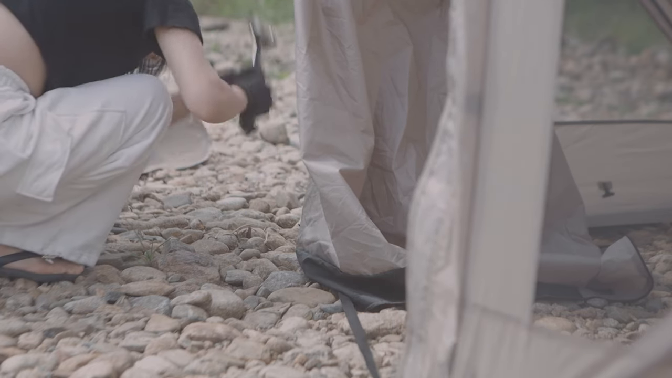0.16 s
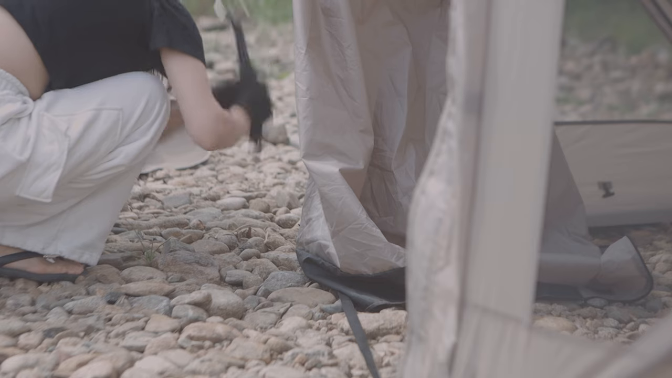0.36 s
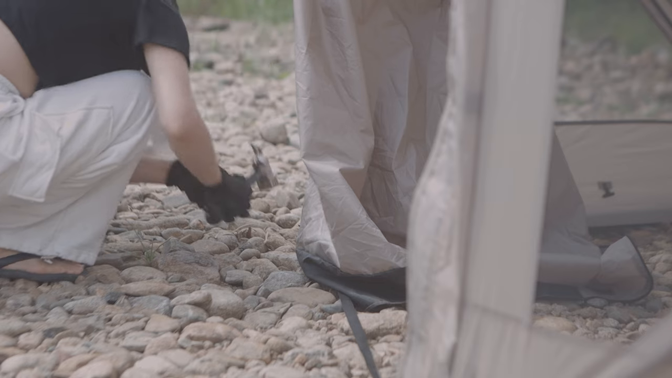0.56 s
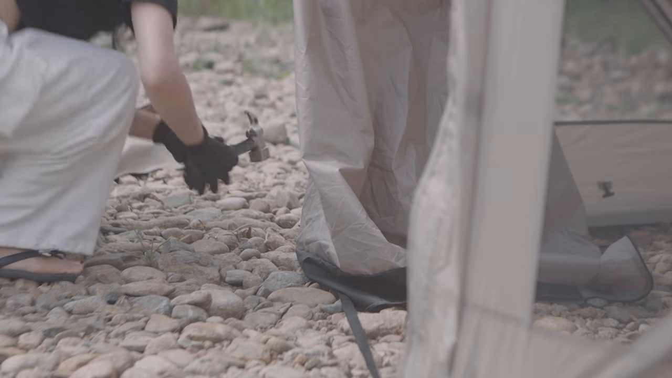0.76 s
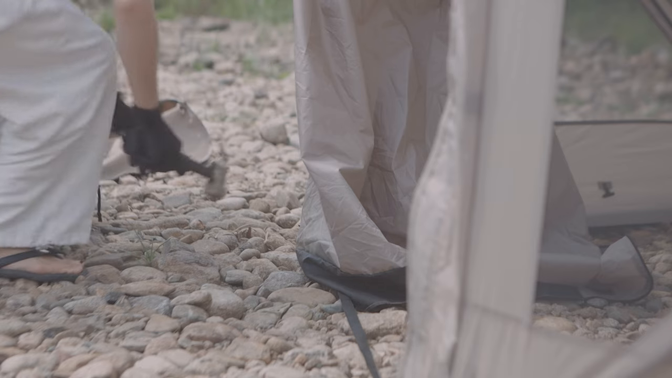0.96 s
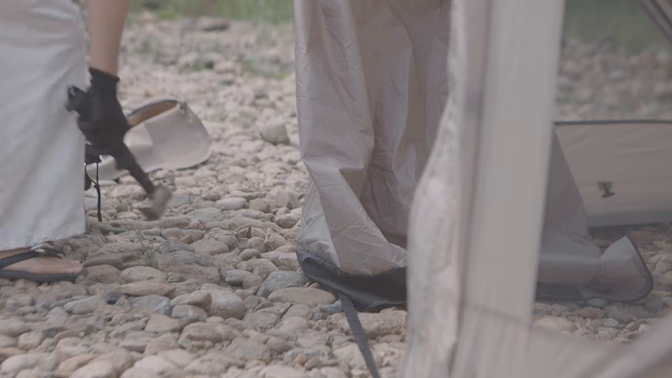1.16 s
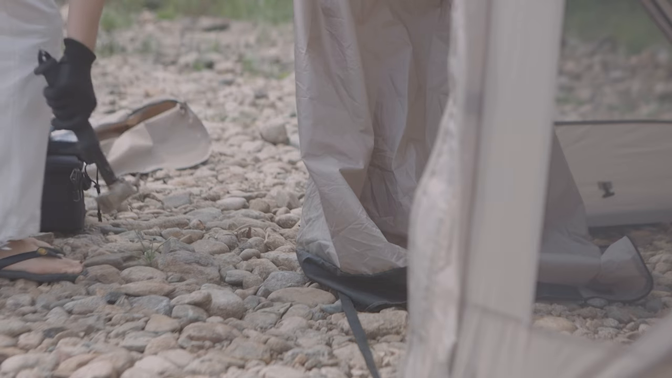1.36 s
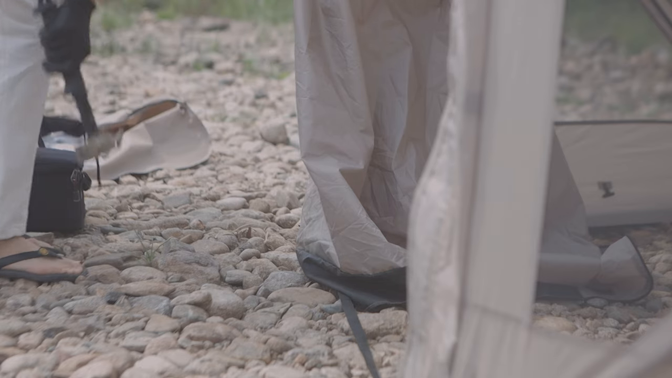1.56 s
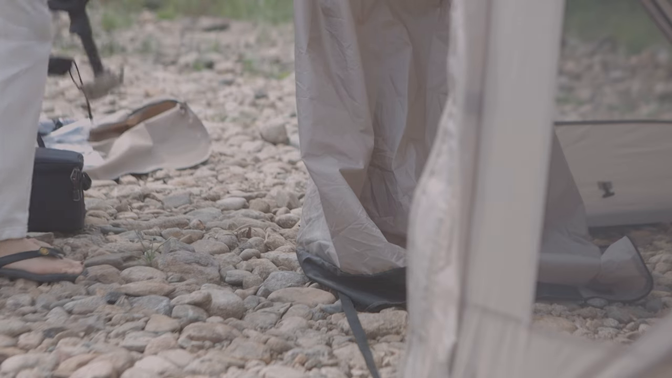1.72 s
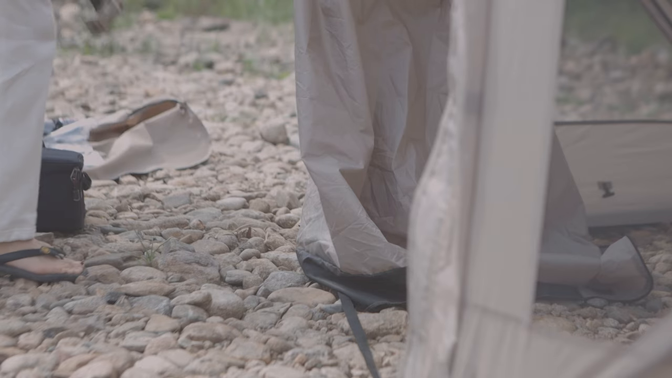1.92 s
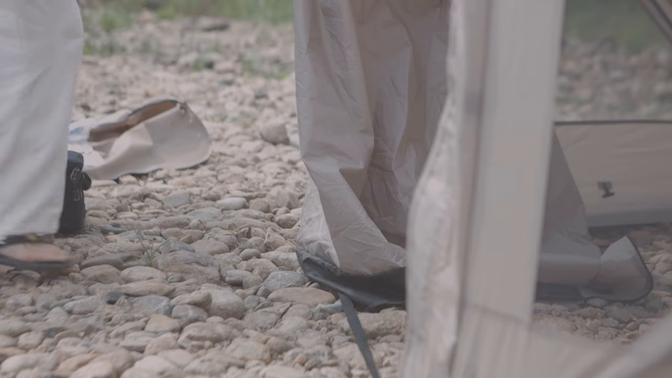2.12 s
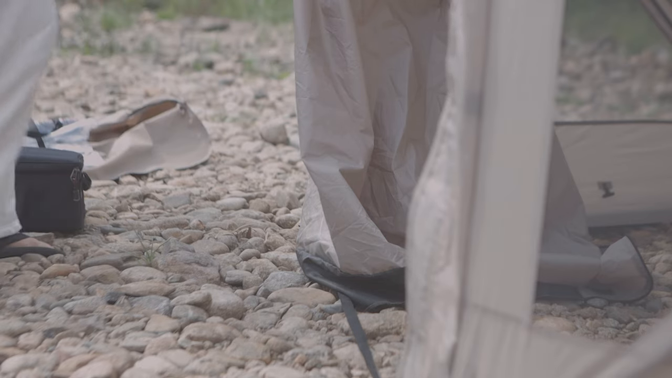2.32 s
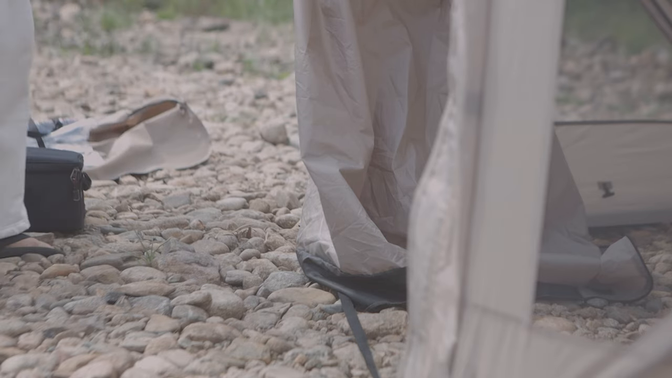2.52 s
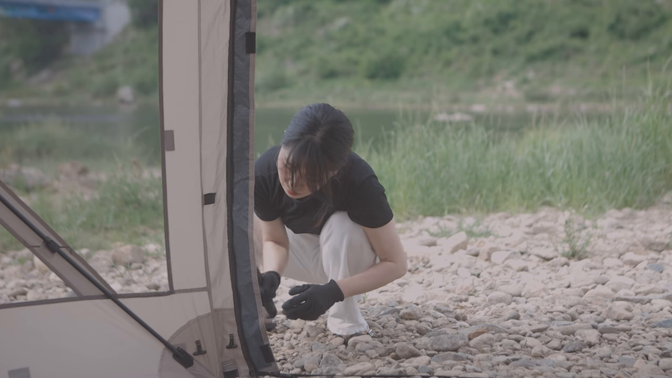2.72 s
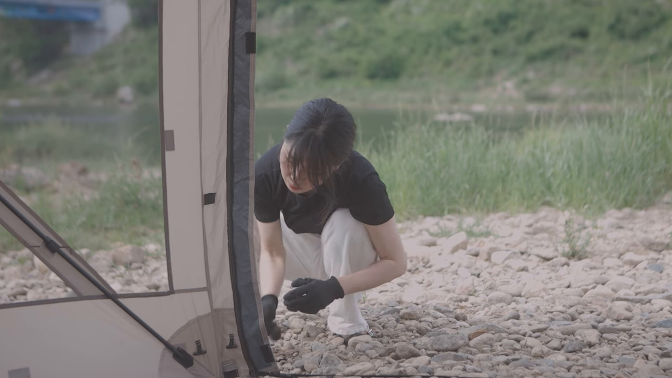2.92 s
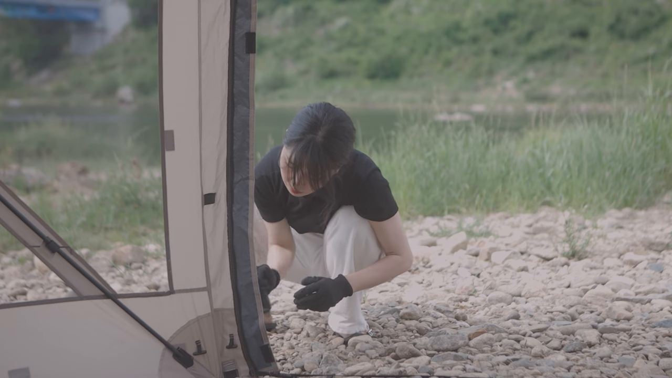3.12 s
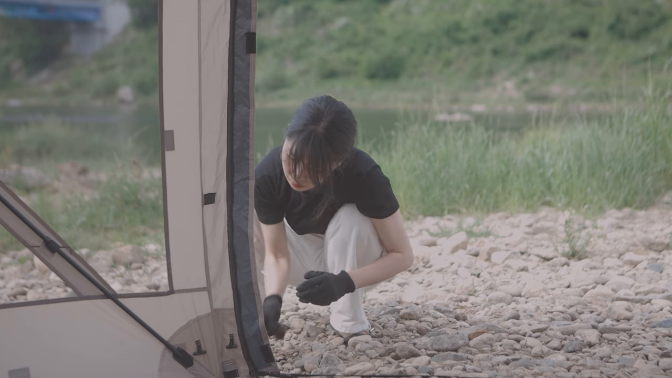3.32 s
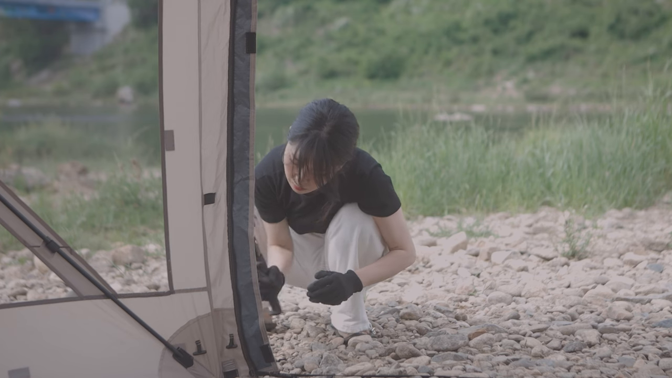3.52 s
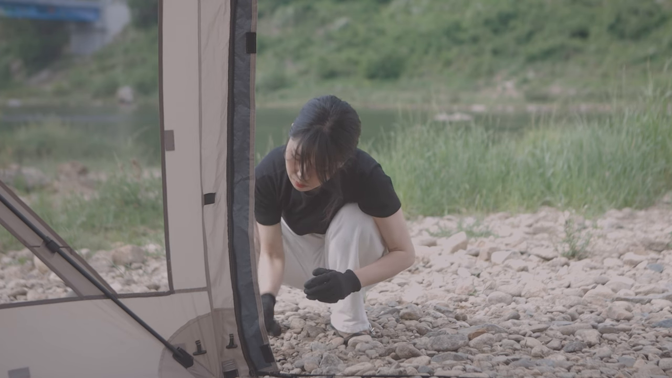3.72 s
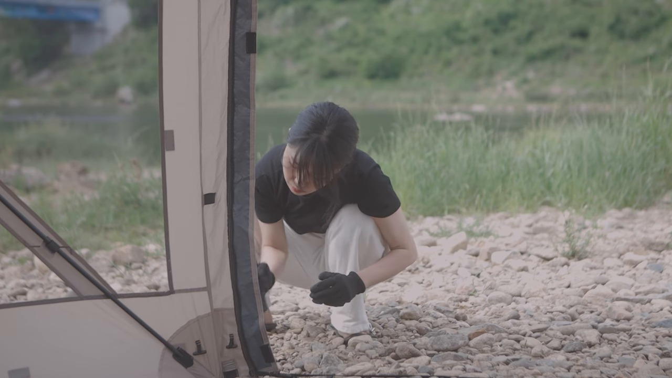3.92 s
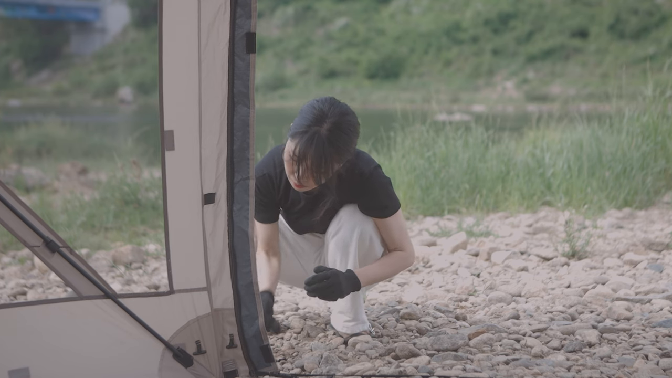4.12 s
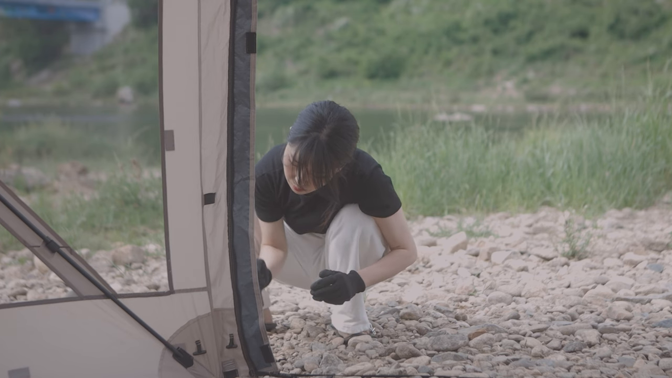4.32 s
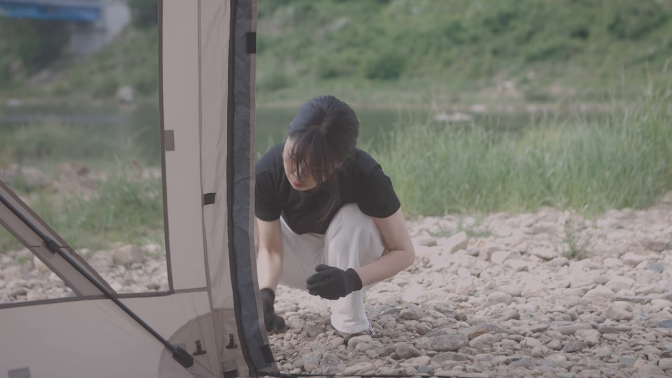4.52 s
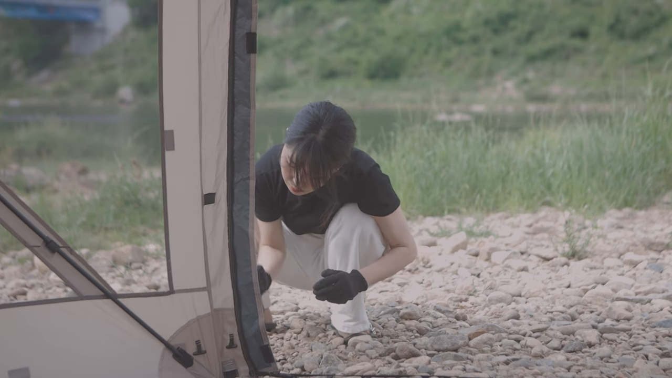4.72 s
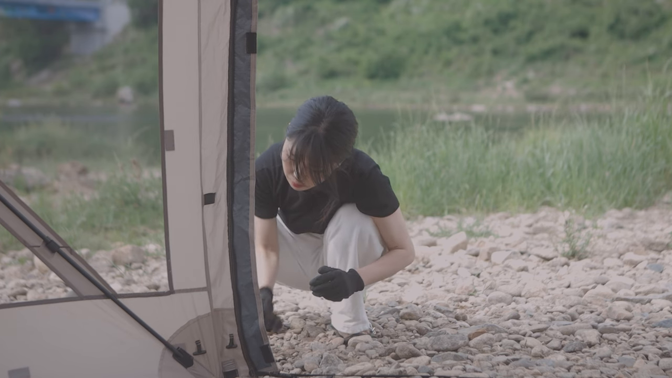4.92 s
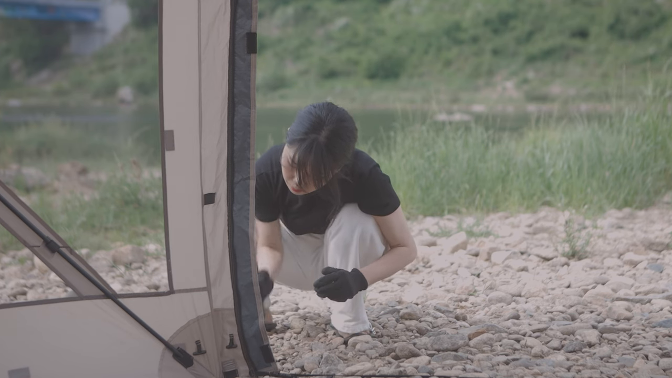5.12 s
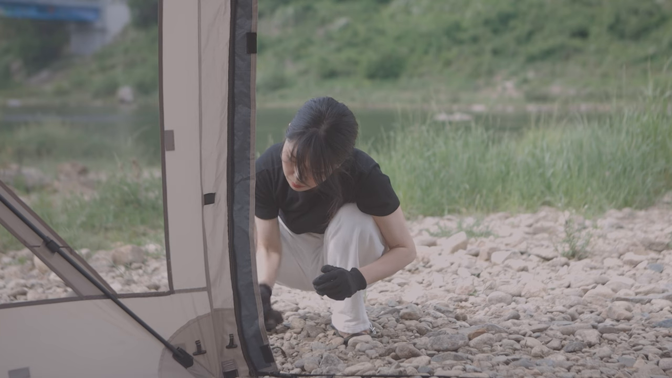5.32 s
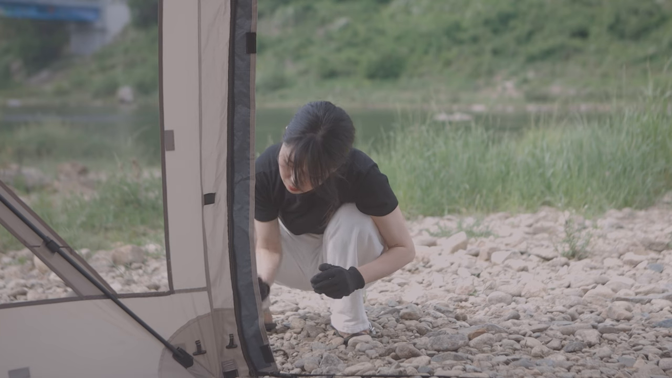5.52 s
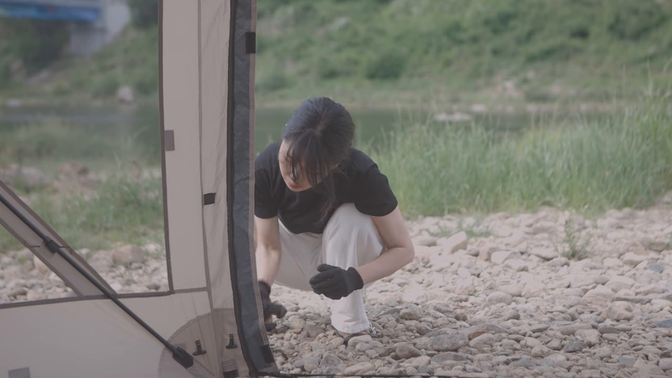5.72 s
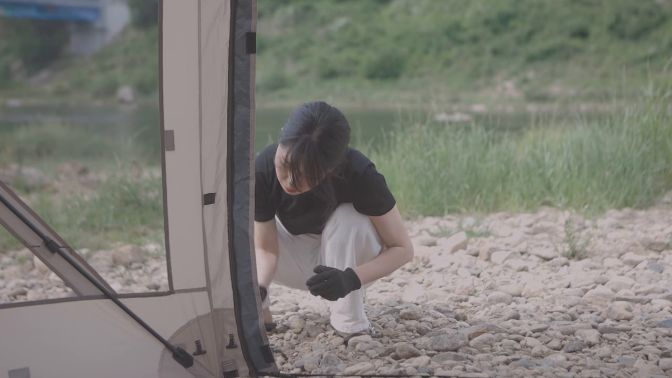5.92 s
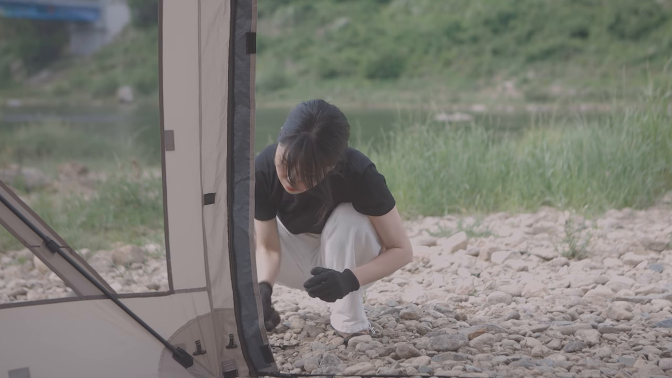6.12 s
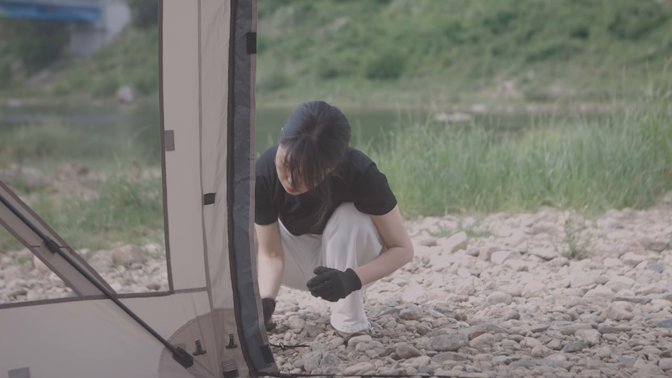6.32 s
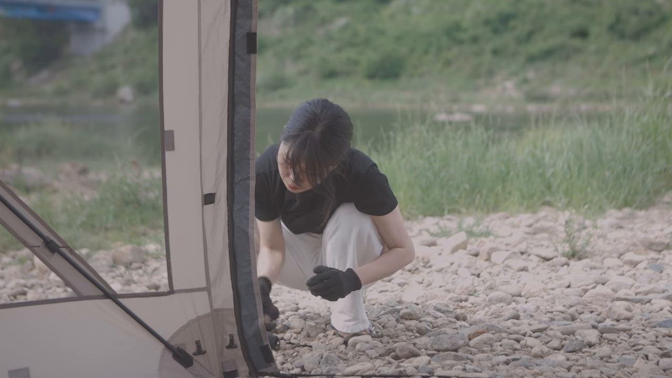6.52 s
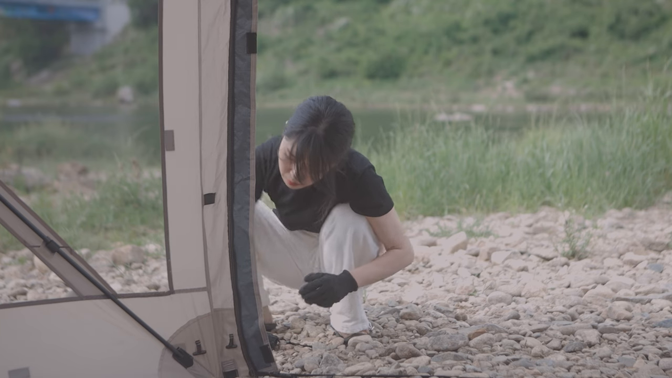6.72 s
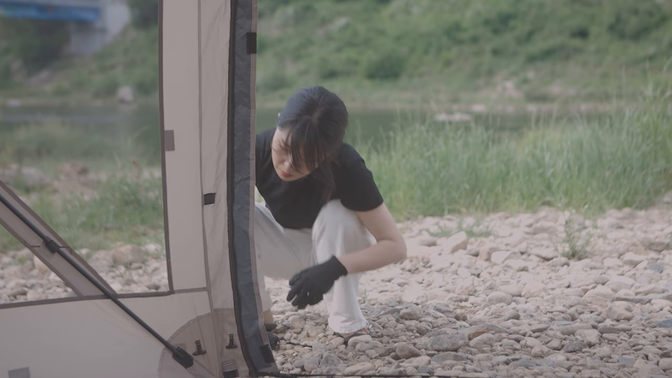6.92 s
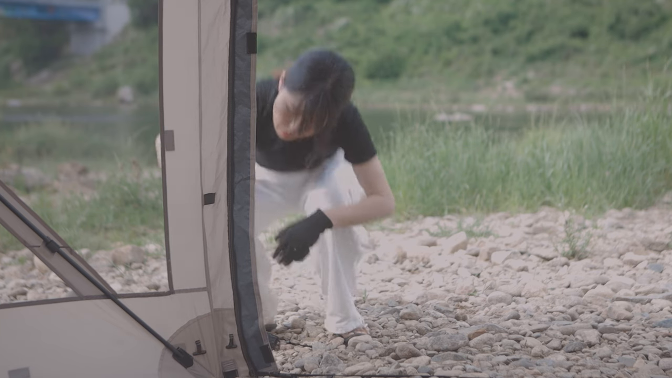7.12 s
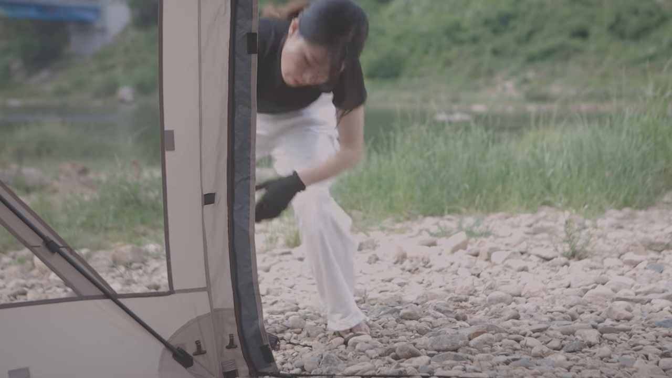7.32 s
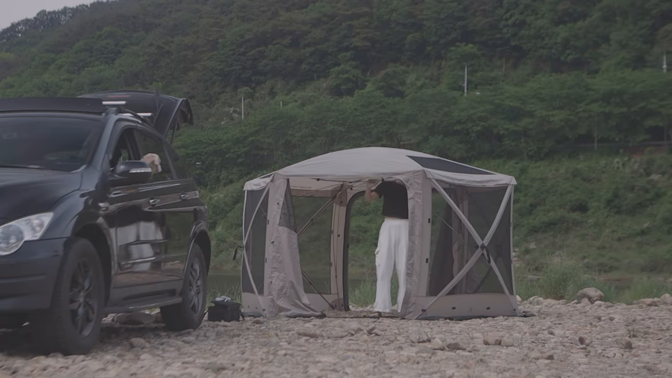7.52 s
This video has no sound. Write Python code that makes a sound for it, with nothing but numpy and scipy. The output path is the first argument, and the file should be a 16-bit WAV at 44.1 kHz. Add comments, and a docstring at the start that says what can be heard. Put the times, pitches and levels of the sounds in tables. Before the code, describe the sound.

Outdoors by a river, one hammer blow and a clink of pegs, a tiny gap, then regular loud metallic peg hammering while a distant motor rises.

```python
"""Hammering tent pegs by a river

A steel hammer drives pegs into a pebble bank: one blow, a clink of spare pegs, then the sound breaks off and
the scene changes to a second peg, struck ten times. Each blow is a dull thump of sines, a crack of noise and a
ringing peg; a limiter ducks the background after it. Behind are river and distant traffic (coloured noise), a
far motor gaining speed (a rising sine), small birds (gliding whistles), thin insects (a narrow band of noise)
and shifting pebbles (tiny clicks). The same kind of clicks opens the scene as the tail of a blow struck just
before the start."""
import sys
import numpy as np
from scipy import signal
from scipy.fft import rfft, irfft, next_fast_len
from scipy.io import wavfile
from scipy.ndimage import uniform_filter1d, minimum_filter1d

SR = 44100
rng = np.random.default_rng(int(sys.argv[2]) if len(sys.argv) > 2 else 0)


def bounce(signal):
    """Save signal as a 16-bit WAV file at the path given by the first command-line argument."""
    frames = np.transpose(np.atleast_2d(signal))
    limited = np.clip(frames, -1, 1)
    pcm = np.round(limited * 32767).astype(np.int16)
    wavfile.write(sys.argv[1], SR, pcm)


N = 332955
TIME = np.arange(N) / SR
# the sound breaks off here and the scene changes to the second peg (s)
BREAK_START, BREAK_END = 2.675, 2.6965


def from_db(db):
    """Turn decibels into a gain."""
    return 10 ** (np.asarray(db) / 20)


def rms_one(x):
    """Scale a sound to an rms (average strength) of 1."""
    return x / np.sqrt(np.mean(x ** 2) + 1e-20)


def in_time(rows):
    """Draw straight lines through a table whose first column is time; one curve per other column."""
    s, *columns = np.transpose(rows)
    return [np.interp(TIME, s, column) for column in columns]


def gain_at(points, hz):
    """Read a gain from a table of frequency and dB, with frequency on a log axis."""
    f, db = np.transpose(points)
    return from_db(np.interp(np.log(hz + 1), np.log(f), db))


def noise(spectrum, width):
    """Make stereo noise of rms 1 with a given colour; more side against mid sounds wider."""
    size = next_fast_len(N)
    hz = np.arange(size // 2 + 1) * SR / size
    mid, side = rfft(rng.standard_normal((2, size))) * gain_at(spectrum, hz)
    side = side * gain_at(width, hz)
    left_right = irfft(np.array([mid + side, mid - side]), size)
    return rms_one(left_right[:, :N])


def even_width(side_db):
    """Give the same side-to-mid ratio at every frequency."""
    return [(1, side_db), (SR, side_db)]


def add(track, s, sound):
    """Mix a sound into a track from time s on."""
    at = max(round(s * SR), 0)
    track[..., at:at + sound.shape[-1]] += sound[..., :N - at]


def fade(t, t60):
    """Die away exponentially, losing 60 dB in t60 seconds."""
    return np.exp(-np.log(1000) * t / max(t60, 1e-4))


def ring(t, hz, db, t60):
    """One mode of a struck body: a sine that dies away."""
    return from_db(db) * np.sin(2 * np.pi * hz * t) * fade(t, t60)


def flutter(t, per_s):
    """A random wobble around zero, from random points joined by lines."""
    knots = np.arange(0, t[-1] + 1 / per_s, 1 / per_s)
    return np.interp(t, knots, rng.standard_normal(len(knots)))


def from_left(x, lag_us):
    """Sound from the left reaches the right microphone later; takes mono or stereo."""
    left, right = np.broadcast_to(x, (2, N))
    spectrum = rfft(right, 2 * next_fast_len(N))
    hz = np.linspace(0, SR / 2, len(spectrum))
    delay = np.exp(-2j * np.pi * hz * lag_us / 10 ** 6)
    return np.array([left, irfft(spectrum * delay)[:N]])


def bank(x, wet_db, t60):
    """Stones, tent and grass throw back a short diffuse tail, different on each side."""
    t = TIME[:SR // 2]
    tail = rng.standard_normal((2, len(t))) * fade(t, t60) * (1 - fade(t, 0.043))
    tail /= np.sqrt(np.sum(tail ** 2, axis=1, keepdims=True))
    echo = signal.fftconvolve(np.atleast_2d(x), tail, axes=1)[:, :N]
    return x + from_db(wet_db) * echo


def rush():
    """River and far traffic blend into coloured noise; at the second peg it lies to the left and grows."""
    # colour at each peg: f/Hz, relative level per Hz/dB
    first_colour = [(15, -65), (25, -37.5), (38, -20), (64, -12.5), (97, 1.5), (249, 4), (818, -9.5),
                    (1330, -7), (2990, -18.5), (4250, -25), (5880, -33), (6740, -36), (9320, -42),
                    (12900, -44.5), (16000, -46.5)]
    second_colour = [(15, -52), (25, -30), (59, -14.5), (161, -5.5), (206, -5), (317, -6), (394, -12.5),
                     (624, -16.5), (962, -15.5), (1700, -19.5), (3000, -27), (5000, -41), (8500, -57.5),
                     (16000, -60)]
    # stereo width at each peg: f/Hz, side-to-mid ratio/dB
    first_width = [(60, -19), (110, -33), (200, -27), (380, -20.5), (700, -9), (1290, -8), (2380, -1),
                   (4400, -2), (8120, -0.5), (15000, 0)]
    second_width = [(60, -13.5), (200, -17), (380, -14), (700, -3.5), (1400, -11), (3000, -5), (5000, -8),
                    (9000, 1.5)]
    first = from_db(-33) * noise(first_colour, first_width)
    second_db = -30.5 + 0.5 * (TIME - BREAK_END)  # grows by 0.5 dB per second
    second = from_db(second_db) * from_left(noise(second_colour, second_width), lag_us=181)
    return np.where(TIME < BREAK_END, first, second)


def insects(floor_db=-78.5):
    """Insects in the grass make a thin, high band of noise that swells over a steady floor."""
    # colour of the buzz: f/Hz, relative level per Hz/dB
    band = [(9000, -34.5), (11500, -12), (12300, -1), (13300, -8.5), (15500, -26.5)]
    # swells on top of the floor: middle t/s, peak level/dB, length/s
    swell_rows = [(2.17, -61, 1.4), (3.15, -67, .6), (5.0, -64.5, .9), (5.8, -71.5, .5), (7.45, -70, .5)]
    level = from_db(floor_db)
    for middle, db, length in swell_rows:
        place = np.clip((TIME - middle) / length, -.5, .5)
        level = level + from_db(db) * np.cos(np.pi * place) ** 2
    return level * noise(band, even_width(-1.5))


def riverside():
    """The steady background: the rush with the insects on top."""
    return rush() + insects()


def motor(waver_db=3.0, waver_hz=1.2):
    """Only the lowest exhaust note carries this far: a rising sine that wavers on the way."""
    # average level of the motor, before its waver: t/s, level/dB
    level_rows = [(2.7, -39.5), (5.3, -35.5), (6.2, -37.5), (7.1, -31), (7.55, -26)]
    start_hz, rise_hz_per_s = 188.3, 7.6  # firing rate and its even rise
    hz = start_hz + rise_hz_per_s * (TIME - BREAK_END)
    db, = in_time(level_rows)
    phase = 2 * np.pi * np.cumsum(hz + waver_hz * flutter(TIME, per_s=10)) / SR
    loudness = np.sqrt(2) * from_db(db + waver_db * flutter(TIME, per_s=8.5))  # sqrt(2): rms to peak
    return loudness * np.sin(phase) * (TIME > BREAK_END)


def whistles(notes, length_s, octaves):
    """One kind of bird note: a sine with an unsteady pitch that glides by some octaves."""
    out = np.zeros(N)
    size = max(int(length_s * SR), 8)
    for s, start_hz, db in notes:
        wobble = rms_one(uniform_filter1d(rng.standard_normal(SR // 4), size=60))[:size]
        glide_hz = start_hz * 2 ** np.linspace(0, octaves, size)
        phase = 2 * np.pi * np.cumsum(glide_hz * (1 + 0.028 * wobble)) / SR
        add(out, s, from_db(db) * np.sin(phase) * signal.windows.tukey(size, .6))
    return out


def birds(wet_db=-4.5, echo_t60=0.13):
    """Small birds give short whistles that glide up or down, smeared by the bank."""
    # rising, then falling notes: t/s, start f/Hz, dry peak level/dB
    rising = [(.247, 5200, -49), (.284, 6020, -41), (1.257, 3400, -41), (1.577, 5000, -35),
              (1.71, 5320, -42.5), (2.232, 3640, -42), (2.408, 5400, -48), (2.439, 6100, -39.5),
              (2.632, 3730, -37.5)]
    falling = [(.628, 4900, -44), (1.183, 5600, -42), (1.202, 4520, -41), (1.726, 4530, -40),
               (2.023, 4150, -44)]
    notes = whistles(rising, 0.0225, 0.406) + whistles(falling, 0.047, -0.38)
    return bank(notes, wet_db, echo_t60)


def bounces(knocks, count=5):
    """Turn each knock into a quick, uneven, dying run of touches: t/s, level/dB."""
    mean_gap_s, loss_db = 0.009, 7.5  # time between touches, loss at each
    for s, db in knocks:
        gaps = mean_gap_s * rng.uniform(.5, 1.5, count)
        yield from zip(s + np.cumsum(gaps) - gaps[0], db - loss_db * np.arange(count))


def spare_pegs(tick_db=1.0, detune=0.023, longest_t60=0.097):
    """Loose steel pegs touch, bounce and damp each other; the pitch differs a little at every touch."""
    # spare pegs knocking together: t/s, relative level/dB
    clinks = [(1.532, -28), (1.585, -44), (1.607, -29.5)]
    # modes of a peg before detuning and damping: f/Hz, relative level/dB, t60/s
    modes = [(4120, -9, 0.07), (4880, -27, 0.11), (5740, -8.5, 0.23), (7840, -9, 0.1), (8269, -17, 0.16),
             (8753, -30, 0.22), (10800, -12.5, 0.073), (12300, -23, 0.055), (13760, -11, 0.057)]
    t, out = TIME[:SR // 2], np.zeros(N)
    for s, level in bounces(clinks):
        size = 1 + detune * rng.standard_normal()
        for hz, db, t60 in modes:
            mode_db = level + db + rng.normal(0, 7.3)  # each touch excites the modes differently
            add(out, s, ring(t, hz * size, mode_db, min(t60, longest_t60)))
        tick = rng.standard_normal(len(t)) * fade(t, 0.037)
        add(out, s, from_db(level + tick_db) * tick)
    return bank(from_left(out, lag_us=31), wet_db=-1.5, t60=0.15)


def pebbles(grains_per_s=1300, level_db=0.0):
    """Pebbles shift in dying clusters of tiny clicks; the tail of an earlier blow is made the same way."""
    # click clusters: t/s, relative level/dB, length/s (a third of the 60 dB decay);
    # the row at .002 s is the tail of a blow struck just before the start, the others are pebbles
    clusters = [(.002, -34, 0.053), (0.785, -43.5, 0.06), (1.129, -43.5, .045), (1.878, -41.5, .035),
                (2.439, -45.5, 0.16), (5.0178, -19.2, 0.0085), (5.41, -26, 0.014), (5.573, -40.5, 0.016),
                (6.107, -33.5, .072), (6.188, -29.5, 0.02), (6.4554, -25.5, 0.036), (6.581, -32, 0.022),
                (6.612, -31, .012), (6.683, -42.5, .016), (6.904, -38.5, 0.015)]
    # six fainter shifts come by chance
    strays = [(s, -50, 0.015) for s in rng.uniform(0, TIME[-1], 6)]
    t, clicks = TIME[:SR // 4], np.zeros(N)
    for s, db, length in clusters + strays:
        hits = rng.random(len(t)) < grains_per_s / SR
        grains = rng.standard_normal(len(t)) * (0.36 + hits)
        add(clicks, s, from_db(db + level_db) * rms_one(grains) * fade(t, 3 * length))
    band = signal.butter(1, [2000, 8500], "band", fs=SR, output="sos")
    bright = signal.sosfilt(band, clicks)
    return bank(from_left(2 * bright, lag_us=24), wet_db=-15.5, t60=.12)


def blows():
    """List each blow with the effects of its ground and of earlier listed blows on the same peg."""
    # hammer on peg: t/s, then relative thump level/dB, crack level/dB, ring level/dB, ring t60/s,
    # big stone level/dB, small stone f/Hz, small stone level/dB
    hits = [ (0.5738, -18.5, -10, -31, .1, -23, 3850, -26.5),
            (3.018, -22.5, -7.5, -19.5, .1, -20, 3240, -15.5),
            (3.402, -18.5, -8.5, -21.5, 0.092, -22.5, 3170, -19),
            (3.7904, -17, -8.5, -19.5, 0.097, -30, 3250, -18.5),
            (4.1873, -19, -7, -17, 0.088, -22, 4270, -17.5), (4.579, -23, -5, -28, .1, -20, 3950, -24.5),
            (4.9636, -19, -6.5, -17.5, 0.095, -31.5, 3400, -17.5),
            (5.357, -13.5, -9.5, -22, 0.13, -21, 3490, -13.5),
            (5.734, -13, -6.5, -16.5, 0.13, -22, 3130, -27), (6.131, -18, -6, -24, 0.11, -27, 2820, -17),
            (6.501, -12.5, -3, -12, 0.079, -16.5, 4400, -24.5)]
    # ground at each peg: lead of thump over crack/s and big stone f/Hz (both at the first blow),
    # relative rumble level/dB, relative scatter level/dB
    sites = [(0.0004, 1350, -16.5, -18.5), (0.0036, 1586, -37, -21)]
    # every blow seats the peg more firmly: the thump comes closer, the big stone sounds higher
    lead_share_kept, stone_hz_per_blow = 0.92, 54.2
    first = [row for row in hits if row[0] < BREAK_START]
    second = [row for row in hits if row[0] > BREAK_END]
    for rows, (lead, big_hz, rumble, scatter) in zip((first, second), sites):
        for done, (s, thump, crack, low, t60, big, small_hz, small) in enumerate(rows):
            high = (crack + low) / 2 - 9  # the high mode follows the mean of crack and ring
            yield (s, lead * lead_share_kept ** done, thump, rumble,
                   big_hz + stone_hz_per_blow * done, big, small_hz, small,
                   crack, low, high, t60, scatter)


def ground(thump_hz=450, thump_t60=.009, thump_db=23, soil_hz=300, soil_t60=0.03, soil_db=10,
           stone_t60=0.023, stone_db=15, rumble_t60=0.24, rumble_db=0.0):
    """The peg is shoved into the bank: a dull thump, two knocking stones and a low rumble."""
    # colour of the rumble: f/Hz, relative level per Hz/dB
    rumble_colour = [(50, -28.5), (110, 1.0), (240, -3.5), (600, -9.5), (1500, -41.5), (5000, -66.0)]
    t = TIME[:SR // 3]
    knocks, swell = np.zeros(N), np.zeros(N)
    for s, lead, thump, rumble, big_hz, big, small_hz, small, *_ in blows():
        push = ring(t, thump_hz, thump + thump_db, thump_t60)
        push = push + ring(t, soil_hz, thump + soil_db, soil_t60)
        add(knocks, s - lead, -push * (1 - fade(t, 0.0053)))  # soft start
        add(knocks, s - lead / 2, ring(t, big_hz, big + stone_db, stone_t60))
        add(knocks, s, ring(t, small_hz, small + stone_db, stone_t60))
        add(swell, s, from_db(rumble + rumble_db) * fade(t, rumble_t60))
    low_cut = signal.butter(1, 90, "high", fs=SR, output="sos")
    knocks = signal.sosfilt(low_cut, knocks)
    return from_left(knocks, lag_us=15) + swell * noise(rumble_colour, even_width(-22.5))


def cracks(shove_db=-3, crack_db=11, contact_s=0.002, crack_t60=0.017,
           scatter_t60=0.12, scatter_db=6, grind_db=6.0):
    """Steel grinds unevenly on steel and stone for a moment, and the crack scatters off the pebbles."""
    # colours of the contact and of its scatter: f/Hz, relative level per Hz/dB
    contact_colour = [(300, -14.5), (700, -3.5), (1100, -11), (2000, -6.5), (4000, -4.5), (6400, -11),
                      (8000, 2.5), (9300, -3.5), (11500, -12), (15500, -8.5)]
    scatter_colour = [(120, -0.5), (500, 7), (1500, 7), (4000, 6.5), (6500, 2), (8500, -2), (11500, -3),
                      (13500, -2), (16000, -14.5)]
    t = TIME[:SR // 3]
    direct, scattered = np.zeros(N), np.zeros(N)
    # quick rise; the fall only starts after contact_s
    contact = (1 - fade(t, 0.0057)) * fade(np.maximum(t - contact_s, 0), crack_t60)
    for s, lead, *_, crack, low, high, t60, scatter in blows():
        uneven = flutter(t, per_s=900)
        add(direct, s - lead, from_db(crack + shove_db) * fade(t, 0.019))
        add(direct, s, from_db(crack + crack_db + grind_db * uneven) * contact)
        add(scattered, s, from_db(scatter + scatter_db) * fade(t, scatter_t60))
    near = direct * from_left(noise(contact_colour, even_width(-9.0)), lag_us=23)
    return near + scattered * noise(scatter_colour, even_width(-4.0))


def peg(low_db=14.8, high_db=12, short_db=14, free_db=3, free_t60=0.03):
    """The peg rings strongly until the stones close on it; they make its high mode chatter."""
    # modes that the ground soon damps, before chance shifts: f/Hz, relative level/dB, t60/s
    short_modes = [(7920, -11.5, 0.024), (8060, -17.5, 0.018), (9180, -9.5, .026)]
    low_hz, high_hz = 5329, 13825  # the two long bending modes
    # bending across the blow is a little higher and weaker, so that the ring beats
    cross_split_hz, cross_db = 28, -10.5
    t, out = TIME[:SR // 3], np.zeros(N)
    gripped = 1 + from_db(free_db) * fade(t, free_t60)
    for s, *_, crack, low, high, t60, scatter in blows():
        # the stones grip the peg differently at every blow
        chance = rng.standard_normal((len(short_modes), 2))
        chatter = 1 + .5 * flutter(t, per_s=250)
        cross_hz = low_hz + cross_split_hz * (1 + .5 * chance[2, 1])
        high_ring = ring(t, high_hz + 18 * chance[0, 1], high + high_db, .85 * t60)
        add(out, s, gripped * ring(t, low_hz + 6 * chance[1, 1], low + low_db, t60))
        add(out, s, -ring(t, cross_hz, low + low_db + cross_db, t60))
        add(out, s, gripped * chatter * high_ring)
        for (hz, db, short_t60), (louder, sharper) in zip(short_modes, chance):
            mode_db = crack + db + short_db + 2 * louder
            add(out, s + 0.00089, ring(t, hz * (1 + 0.0089 * sharper), mode_db, short_t60))
    # the second scene opens on a dying ring
    dying_db, dying_t60 = -24.5, 0.2
    add(out, BREAK_END, ring(t, low_hz, dying_db, dying_t60))
    add(out, BREAK_END, ring(t, high_hz, dying_db - 19.5, dying_t60))
    return bank(from_left(out, lag_us=19), wet_db=-11, t60=0.1)


def hammer():
    """Each blow sounds the ground, the contact and the peg."""
    return ground() + cracks() + peg()


def scene():
    """Mix all sources; the sound breaks off where the scene changes from the first peg to the second."""
    sounding = (TIME < BREAK_START) | (TIME >= BREAK_END)
    background = riverside() + motor() + birds()
    return (background + spare_pegs() + pebbles() + hammer()) * sounding


def limiter(x, threshold_db=5.0, attack_s=0.0019, hold_s=0.032, release_db_per_s=170):
    """Peaks pull the gain down; it is held briefly and then climbs back."""
    peak_db = 20 * np.log10(np.abs(x).max(axis=0) + 1e-9)
    over = np.maximum(peak_db - threshold_db, 0)
    half = int(hold_s * SR / 2)
    held = -minimum_filter1d(-over, 2 * half + 1, origin=half)  # largest excess of the last hold_s
    climb = release_db_per_s * TIME
    released = np.maximum.accumulate(held + climb) - climb
    r = np.exp(-1 / (attack_s * SR))
    reduction_db = signal.lfilter([1 - r], [1, -r], released)
    return x * from_db(-reduction_db)


def record(dry):
    """The limiter is too slow for the cracks, which overload into a soft ceiling; the top is cut."""
    overloaded = 0.85 * np.tanh(limiter(dry) / 0.94)
    top_cut = signal.ellip(10, .2, 70, 15900, fs=SR, output="sos")  # low-pass at 15900 Hz
    return signal.sosfilt(top_cut, overloaded)


dry = scene()
out = record(dry)
bounce(out)
```